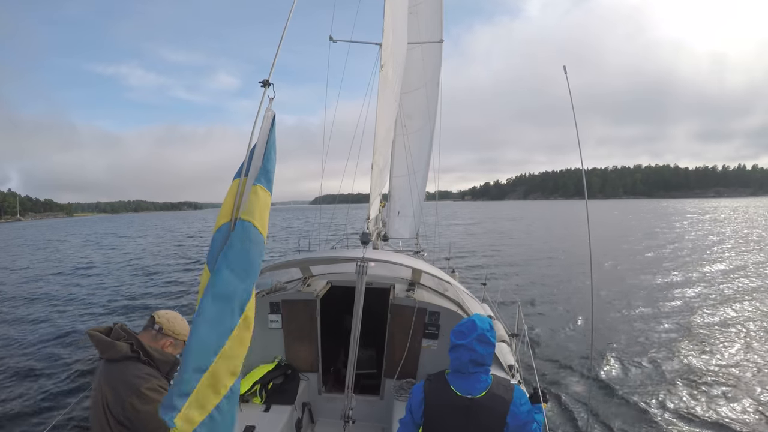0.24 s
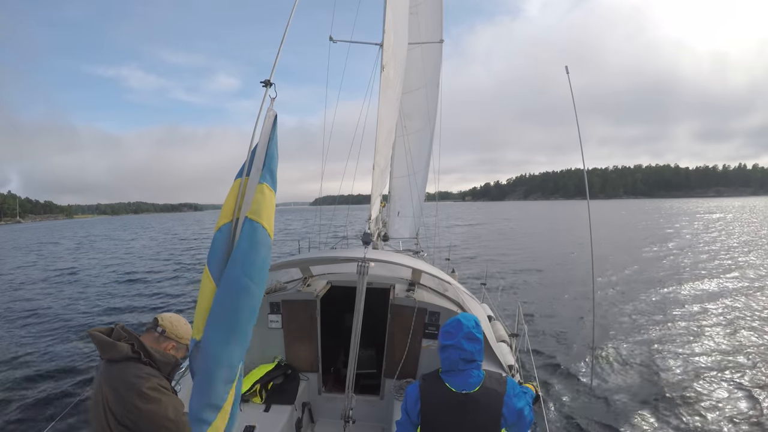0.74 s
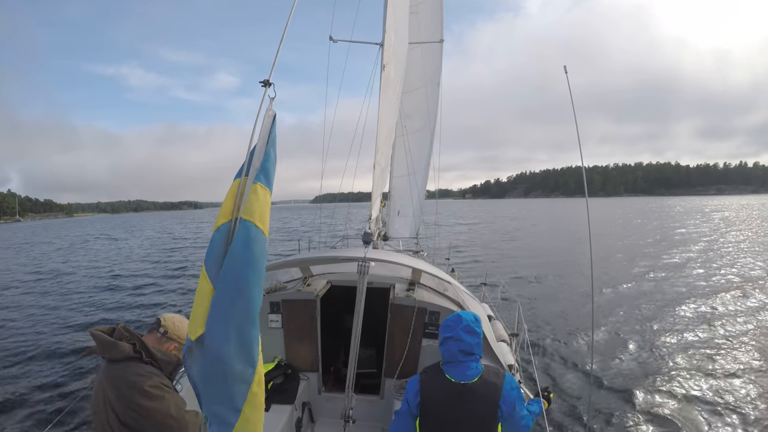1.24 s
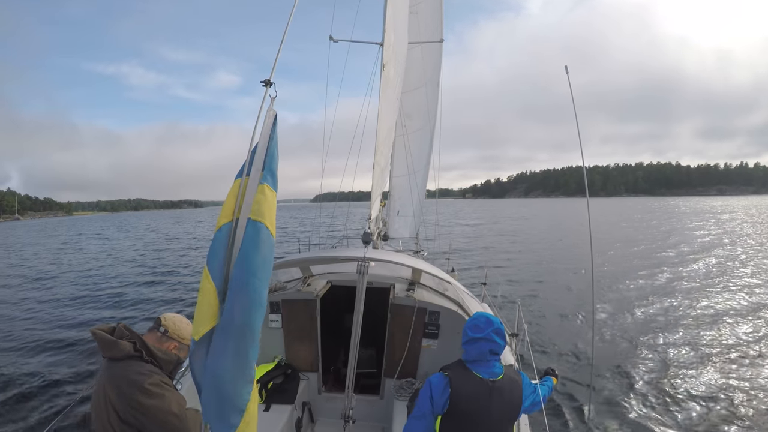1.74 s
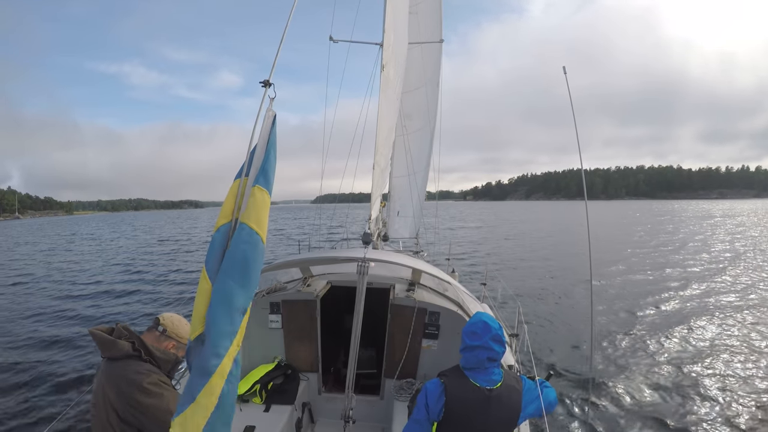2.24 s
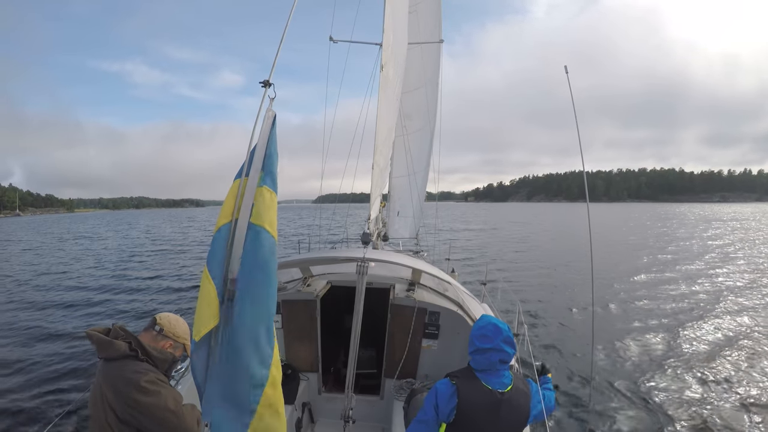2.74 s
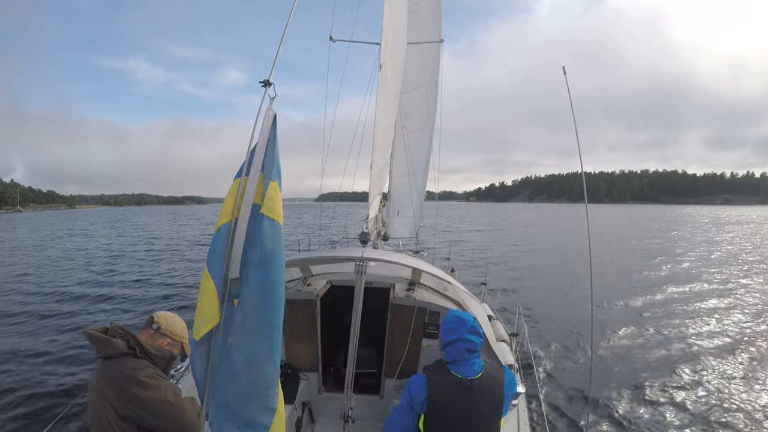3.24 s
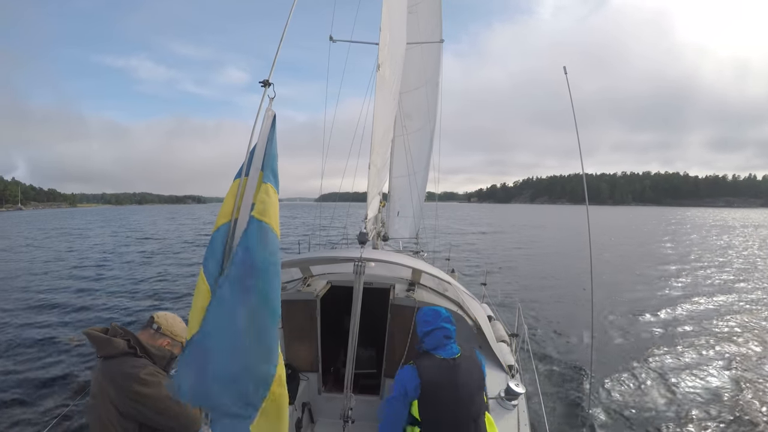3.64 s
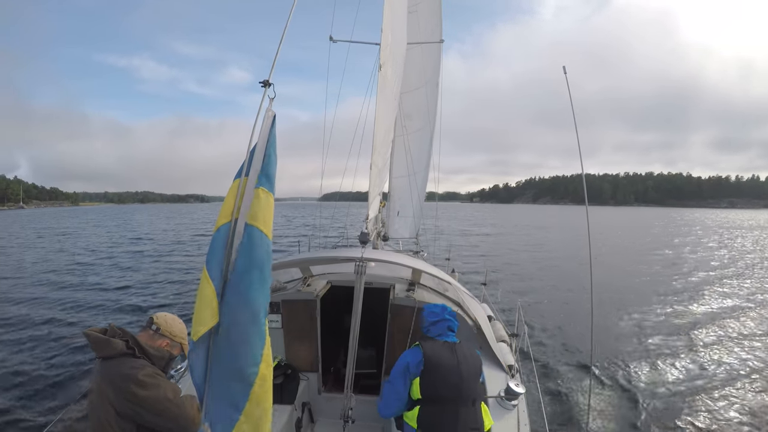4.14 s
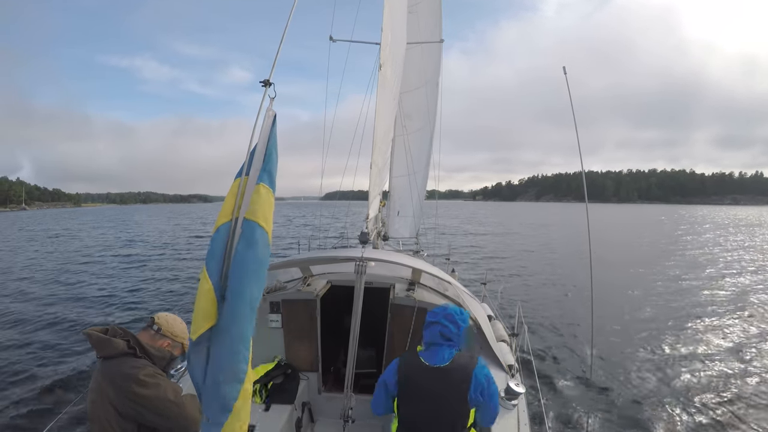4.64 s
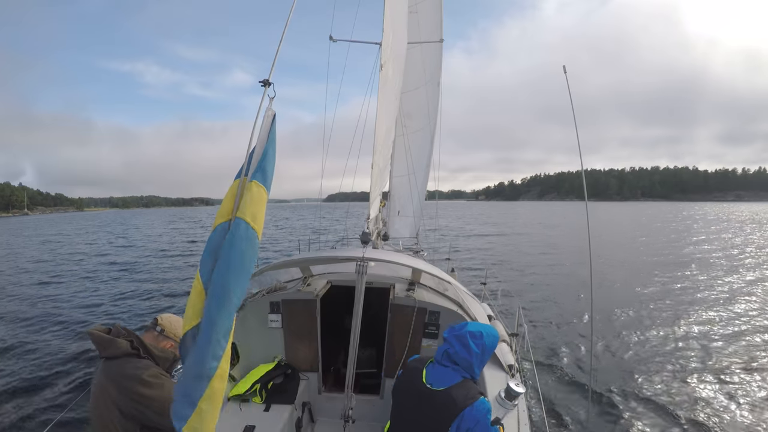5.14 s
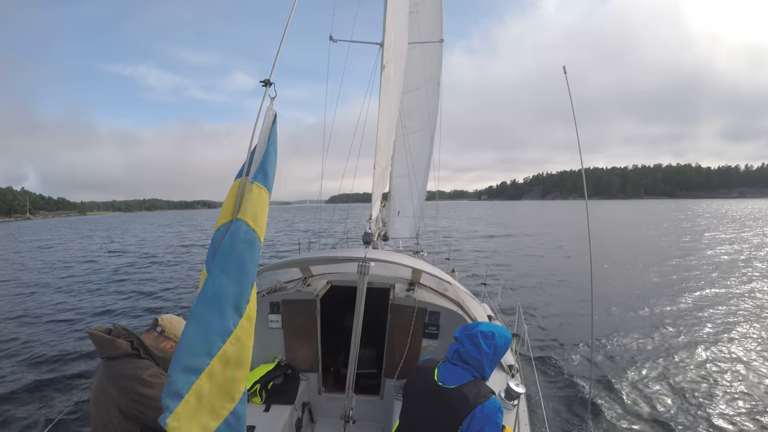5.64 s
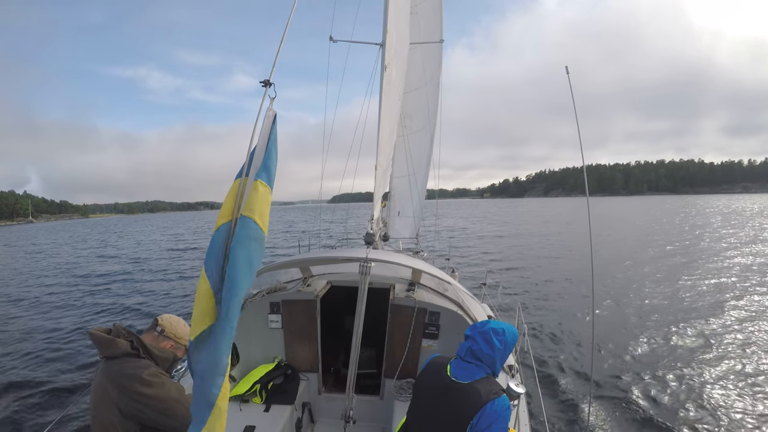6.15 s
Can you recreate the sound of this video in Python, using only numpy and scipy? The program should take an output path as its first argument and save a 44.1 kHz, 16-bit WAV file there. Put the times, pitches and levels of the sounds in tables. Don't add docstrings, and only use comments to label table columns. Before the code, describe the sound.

A rail-mounted microphone on a sailing boat hears mostly vibration through its mount, close and dry, with low wind rumble and faint hiss. At 0 to 0.2 s two hollow knocks land with a gust and a low hum, then light taps. Knocks return at 0.95 and 1.15 s, and from 1.38 to 1.76 s a rapid clattering run of woody blows and metallic rattles swells the deep hum, ending in a strong thump. It calms to faint taps and gurgles until a short cluster at 2.6 to 2.7 s with a spray hiss. Soft sloshing follows; near 3.65 s a deep shudder hums with a wind buffet. At 4.25 s the loudest blow cracks sharply, a wire singing briefly after it, followed by splashes and lesser knocks to 4.6 s. Spray hisses and gurgles at 4.8 s, then quiet rubbing and lapping, with a small knock at 6.07 s.

```python
import sys
import numpy as np
from scipy import signal
from scipy.fft import rfft, irfft, next_fast_len
from scipy.io import wavfile
from scipy.ndimage import uniform_filter1d, map_coordinates

SR = 44100
rng = np.random.default_rng(int(sys.argv[2]) if len(sys.argv) > 2 else 0)


def volts_from_db(level):
    exponent = np.asarray(level, float) / 20
    return 10 ** exponent


def file_out(sig):
    cols = np.atleast_2d(sig).T
    lim = np.clip(cols, -1, 1)
    pcm = np.round(lim * 32767).astype(np.int16)
    wavfile.write(sys.argv[1], SR, pcm)


N = 281799

# f/Hz, level/dB, t60/s
FITTING_MODES = [(2260, -2, .014), (2400, -1, .015), (2630, 0, .016), (2850, -1, .014), (3050, -3, .012),
                 (3270, -6, .013), (3550, -9, .011), (3850, -9, .013), (4150, -15, .01), (4450, -17, .01),
                 (4850, -20, .01), (5350, -20, .018), (5650, -21, .012), (6400, -25, .008)]
DRAIN_DB, DRAIN_T60_S = -15, .1


def unit(x):
    return x / np.sqrt(np.mean(x ** 2) + 1e-20)


def curves(rows):
    s, *cols = np.transpose(rows)
    return [np.interp(np.arange(N) / SR, s, c) for c in cols]


def wobble(rate_hz):
    knots = rng.standard_normal(int(N * 60 / SR) + 8)
    return map_coordinates(knots, [np.arange(N) * min(rate_hz, 59) / SR])


def filtered(x, response):
    m = next_fast_len(N + SR // 2)
    return irfft(rfft(x, m) * response(np.fft.rfftfreq(m, 1 / SR)), m)[:N]


def coloured(x, spectrum):
    f, db = np.transpose(spectrum)
    return filtered(x, lambda hz: volts_from_db(np.interp(np.log(hz + 1), np.log(f + 1), db)))


def noise(spectrum):
    return unit(coloured(rng.standard_normal(N), spectrum))


def place(out, sound, start_s):
    out[max(round(start_s * SR), 0):][:len(sound)] += sound


def swell(length_s, clumps_db, count):
    rough = rng.standard_normal((2, count))
    clumps = volts_from_db(clumps_db * unit(uniform_filter1d(rough[1], size=300)))
    rise_fall = np.sin(np.pi * np.clip(np.arange(count) / SR / length_s, 0, 1)) ** 1.5
    return rise_fall * clumps * rough[0]


def ring(modes, t, near_hz=1000, fall_db=0):
    hz, db, t60_s = np.transpose(modes)[:, :, None]
    luck = rng.standard_normal((2, len(modes), 1))
    build = np.minimum(t * hz / 3.36, 1) ** 2
    db = db - fall_db * np.log2(hz / near_hz) ** 2
    decay = volts_from_db(db + 1.5 * luck[0]) * np.exp(-np.log(1000) * t / t60_s)
    waves = decay * np.sin(2 * np.pi * hz * (1 + .006 * luck[1]) * t)
    early = 1 + 0.49 * np.exp(-t / 0.0046)
    return np.sum(build * waves, axis=0) * early


def boat(push, hull_db, deck_db, rail_db, fitting_db, near_hz=1000, fall_db=0):
    # f/Hz, level/dB, t60/s
    mount_modes = [(781.6, -6.5, 0.063), (861.7, 0, 0.057), (913.3, -0.5, 0.027), (1030, -1.5, 0.033),
                   (1108.3, 3, 0.034), (1200, -2.5, 0.039), (1326, -10, 0.075)]
    hull_modes = [(179.6, -9, 0.12), (234, -6.5, 0.17), (268, -4.5, 0.16), (325.2, -9.5, 0.11),
                  (375.7, -5, 0.052)]
    deck_modes = [(493.8, -2.5, 0.12), (517.7, -0.5, 0.055), (604.8, 2, 0.11), (700, -1, 0.11)]
    rail_modes = [(1510.5, 0.5, 0.033), (1630, 0.5, 0.041), (1710, 1, 0.04), (1800, -6, 0.065),
                  (1954, -3, 0.026), (2192, -7, 0.023)]
    t = np.arange(SR // 9) / SR
    rings = [ring(mount_modes, t, near_hz, fall_db)]
    rings += [ring(modes, t) for modes in (hull_modes, deck_modes, rail_modes, FITTING_MODES)]
    answers = signal.fftconvolve(np.array(rings), np.atleast_2d(push), axes=1)
    peaks = np.max(np.abs(answers), axis=1)
    return (volts_from_db(np.array([0, hull_db, deck_db, rail_db, fitting_db])) / peaks) @ answers


def wind():
    # t/s, level/dB
    gust_rows = [(0.0, -37.5), (0.28, -51.5), (0.34, -49.5), (0.69, -58.5), (0.94, -47), (1.58, -41),
                 (1.94, -49.5), (3.58, -51), (3.75, -38), (3.84, -52.5), (5.29, -50.5), (5.43, -50.5),
                 (6.05, -52), (6.39, -48)]
    # f/Hz, density/dB per Hz
    buffet_spectrum = [(12, -33.5), (20, -1), (49, 3), (66, 6), (92, -1), (124, 0), (140, -4.5), (152, -15),
                       (189, -24), (255, -25), (323, -37.5), (400, -43), (520, -72), (880, -120)]
    # f/Hz, density/dB per Hz
    hiss_spectrum = [(300, -8), (420, -10), (630, -3), (1000, -10.5), (1800, -12), (2400, -14.5),
                     (4000, -16.5), (8000, -22.5), (12500, -25.5), (15000, -24), (15500, -59)]
    buffet = volts_from_db(curves(gust_rows)[0] + 7.5) * noise(buffet_spectrum)
    return buffet + volts_from_db(-63.0) * noise(hiss_spectrum)


def wash():
    # t/s, level/dB
    lapping_rows = [(0.0, -40), (0.69, -69), (0.93, -67), (1.07, -70), (1.21, -44.5), (1.46, -44.5),
                    (1.87, -50), (2.21, -56.5), (3.22, -51.5), (3.9, -66), (4.2, -69), (4.31, -39),
                    (4.56, -53), (4.88, -56.5), (5.3, -58), (5.6, -57), (5.87, -64), (6.39, -55.5)]
    push = rng.standard_normal(N) * volts_from_db(5 * wobble(30))
    return volts_from_db(curves(lapping_rows)[0] - 6.0) * unit(boat(push, -0.77, -2.6, -9.0, -17)[:N])


def shaken(rows, fade_db_per_s):
    t = np.arange(0, N + 64, 64) / SR
    energy = 0
    for s, build_s, hold_s, db in rows:
        before_db = 20 * np.maximum(s - t, 0) / build_s
        after_db = fade_db_per_s * np.maximum(t - s - hold_s, 0)
        energy = energy + volts_from_db(db - before_db - after_db) ** 2
    return np.interp(np.arange(N) / SR, t, np.sqrt(energy))


def pole():
    # t/s, build-up/s, hold/s, level/dB
    rock_rows = [(0, 0.034, 0.01, -32.5), (0.098, .05, .02, -41), (.25, 0.11, 0.057, -37.5),
                 (0.493, 0.37, 0.093, -36.5), (1.086, 0.2, 0.081, -26), (1.394, 0.11, 0.09, -22),
                 (1.706, 0.18, .05, -30.5), (1.815, 0.26, 0.19, -27.5), (2.162, 0.12, 0.021, -30.5),
                 (2.323, 0.14, 0.026, -32.5), (2.695, 0.14, 0.27, -30.5), (3.227, 0.11, 0.018, -33),
                 (3.646, 0.027, 0.011, -17.5), (3.755, .1, 0.17, -23), (4.204, 0.18, 0.13, -39),
                 (4.423, 0.13, 0.3, -43), (4.872, 0.3, 0.077, -31), (5.304, 0.14, 0.15, -33),
                 (5.597, 0.36, 0.2, -31.5), (5.99, .15, 0.043, -35), (6.251, 0.18, 0.15, -30.5)]
    # t/s, hold/s, level/dB
    jolt_rows = [(0.03, 0.0079, -20), (0.163, 0.044, -28), (0.356, .02, -38), (0.523, 0.19, -45.5),
                 (.95, 0.094, -39), (1.199, 0.014, -19.5), (1.426, 0.074, -18.5), (1.559, 0.055, -17.5),
                 (1.805, 0.017, -16), (1.99, 0.08, -36), (2.172, 0.017, -35.5), (2.403, 0.018, -37.5),
                 (2.607, 0.091, -30.5), (2.764, 0.041, -28), (2.96, 0.027, -42), (3.102, 0.092, -39),
                 (3.655, 0.0067, -19), (3.8, 0.046, -36), (4.278, 0.034, -24.5), (4.412, 0.019, -28),
                 (4.593, 0.069, -31), (4.926, 0.047, -32.5), (5.147, 0.075, -36.5), (5.347, 0.074, -46),
                 (5.958, 0.062, -45.5), (6.117, 0.11, -39.5)]
    jolt_hz = [122.6, 121.3, 126.4, 121.1, 120.8, 121.9, 121.4, 119.4, 123.2, 120.6, 120.2, 120.1, 126.5,
               127.9, 122.5, 114.6, 119.9, 119.7, 115, 120.4, 127, 126.9, 124.8, 124.4, 123.1, 117.4]
    build_s = 0.027
    jolts = [(s, build_s, hold_s, db) for s, hold_s, db in jolt_rows]
    pitches = [(s + hold_s / 2 + build_s / 2, hz) for (s, hold_s, db), hz in zip(jolt_rows, jolt_hz)]
    lower = (63.95, shaken(rock_rows, 130.5), .012, 1)  # Hz, amplitude, pitch wander, flutter dB
    upper = (curves(pitches)[0], shaken(jolts, 158), .012, 2)
    hum = 0
    for hz, level, wander, flutter_db in (lower, upper):
        phase = 2 * np.pi * np.cumsum(hz * (1 + wander * wobble(11))) / SR
        hum = hum + level * volts_from_db(flutter_db * wobble(18)) * np.sin(phase)
    return hum


def spray():
    # t/s, length/s, centre f/Hz, width/octaves, level/dB
    spray_rows = [(1.38, 0.2, 4480, .5, -76), (2.588, 0.041, 4480, 0.34, -76),
                  (2.716, 0.052, 3200, 0.71, -58), (2.722, 0.021, 7940, 0.044, -65),
                  (2.927, 0.051, 3350, 0.28, -61.5), (2.953, 0.031, 5300, 0.078, -63.5),
                  (3.53, 0.11, 3320, 0.57, -62), (4.326, 0.05, 6960, 0.32, -67),
                  (4.329, 0.046, 3220, 0.31, -59.5), (2.996, 0.21, 2700, 0.63, -71),
                  (4.77, 0.23, 2780, 0.62, -57), (5.413, 0.13, 2700, 0.35, -72), (4.8, 0.15, 6500, .4, -69),
                  (4.845, 0.065, 5360, 0.07, -67), (4.885, 0.067, 5380, 0.041, -66),
                  (5.573, 0.085, 5230, 0.13, -72), (6.078, 0.024, 3960, .7, -68.5)]
    # t/s, length/s, centre f/Hz, level/dB
    gurgle_rows = [(.274, 0.09, 1030, -56), (.085, 0.024, 1400, -62), (.262, 0.024, 1600, -61),
                   (1.295, 0.042, 760, -48.5), (1.33, 0.026, 1080, -47), (1.335, 0.028, 1970, -58),
                   (2.465, .05, 705, -63), (2.5, 0.16, 230, -56), (3.0, 0.15, 232, -56),
                   (3.56, 0.038, 1240, -54.5), (3.615, 0.05, 206, -49.5), (3.8, 0.16, 402, -71),
                   (4.285, 0.057, 640, -42.5), (4.62, 0.058, 610, -47.5), (4.775, 0.05, 1030, -55.5),
                   (4.805, 0.041, 1480, -58), (4.86, 0.044, 1030, -51), (4.982, 0.055, 650, -58.5),
                   (5.038, 0.036, 1150, -61), (5.148, 0.054, 490, -57), (5.3, 0.17, 400, -65),
                   (5.368, 0.032, 816, -57.5), (5.39, 0.022, 1630, -63), (5.235, 0.041, 580, -62.5),
                   (5.19, 0.035, 1634, -63.5), (5.43, .08, 1540, -59), (5.81, .08, 684, -71),
                   (6.07, 0.052, 870, -54), (6.15, 0.045, 1103, -62)]
    # t/s, length/s, centre f/Hz,
    # level/dB
    pocket_rows = [(.31, 0.044, 3230, -71), (.598, 0.039, 880, -60.5), (2.37, .04, 1110, -60),
                   (2.48, .04, 1320, -68), (2.497, 0.038, 1770, -67.5), (2.49, .06, 840, -67),
                   (2.799, 0.025, 1700, -69), (2.985, 0.036, 1750, -70), (3.029, 0.087, 600, -55.5),
                   (3.4, .03, 840, -70), (3.451, 0.037, 1780, -69), (3.525, .03, 874, -64.5),
                   (3.55, .03, 1400, -66), (3.585, .035, 857, -59), (3.627, 0.031, 1800, -65),
                   (3.663, 0.03, 1760, -68), (3.735, .03, 790, -71.5), (3.8, .04, 730, -76),
                   (4.252, 0.011, 3250, -43), (4.427, 0.015, 3270, -52), (4.903, 0.054, 1720, -59),
                   (5.465, .093, 618, -62.5), (5.545, 0.034, 1710, -69), (5.644, 0.029, 1166, -65.5),
                   (5.881, 0.055, 1710, -72), (6.13, 0.085, 692, -58), (6.29, 0.03, 1090, -68.5)]
    bursts = list(spray_rows)
    for rows, octaves in ((gurgle_rows, 0.2), (pocket_rows, 0.042)):
        bursts += [(s, length_s, hz, octaves, db) for s, length_s, hz, db in rows]
    out, hz = np.zeros(N + SR), np.fft.rfftfreq(12000, 1 / SR) + 1
    for s, length_s, centre_hz, octaves, db in bursts:
        band = np.exp(-.5 * (np.log2(hz / centre_hz) / octaves) ** 2)
        burst = irfft(rfft(swell(length_s, clumps_db=3, count=12000)) * band)
        burst = np.roll(burst, 882)
        place(out, volts_from_db(db + 12) * burst / np.max(np.abs(burst)), s - 882 / SR)
    return out[:N]


def struck_notes(rows, build_s):
    t, out = np.arange(N) / SR, np.zeros(N)
    for s, hz, db, t60_s in rows:
        u = np.maximum(t - s, 0)
        envelope = volts_from_db(db - 60 * u / t60_s) * (1 - np.exp(-u / build_s)) ** 2
        out += envelope * np.sin(2 * np.pi * hz * u)
    return out


def stay():
    # t/s, f/Hz, level/dB, t60/s
    wire_rows = [
        (.628, 1720, -40, 0.089),
        (.672, 2170, -29.5, 0.037),
        (.975, 2150, -37, 0.12),
        (1.782, 1856, -35.5, 0.15),
        (4.268, 1850, -28, 0.19),
        (4.44, 1890, -37, 0.09),
    ]
    return struck_notes(wire_rows, build_s=0.0051) * volts_from_db(1.5 * wobble(50))


def thumps():
    # t/s, f/Hz, level/dB, t60/s
    thump_rows = [(1.7598, 726, 3.5, 0.017), (1.762, 842, -13, 0.053), (1.765, 1804, -16.5, 0.062),
                  (4.2525, 1093, -1.5, 0.035), (4.2598, 1906, -9, 0.025), (4.263, 798, -11, 0.099),
                  (4.272, 620, -18, 0.039)]
    return struck_notes(thump_rows, build_s=0.00095)


def sloshes():
    # t/s, length/s, peak level/dB, deck level/dB, rail level/dB
    slosh_rows = [(0, 0.22, -61, 5, -28), (0.251, 0.18, -48, -16, -3), (0.418, 0.11, -49, -10, -10),
                  (0.827, 0.29, -41, -15, -18), (0.97, 0.061, -43, -22, -23),
                  (1.114, 0.068, -28.5, -27, -31), (1.289, 0.14, -42.5, -45, -10.5),
                  (1.387, 0.25, -36, -2, -22.5), (1.766, 0.095, -44, 1.5, -17),
                  (2.601, 0.19, -43, -4.5, -6), (2.96, 0.24, -48.5, 2, -6), (3.199, 0.27, -55, -32, -1.5),
                  (3.521, 0.14, -45.5, -14, -7.5), (4.182, 0.08, -50, -5, -23),
                  (4.31, 0.056, -33, -3.5, -15), (4.433, 0.065, -43, -3.5, -15), (4.488, 0.041, -54, 0, -7),
                  (4.774, 0.2, -41, -29, -0.5), (4.976, 0.084, -56, -4, -12), (5.138, 0.17, -65.5, 7.5, -2),
                  (5.354, 0.2, -49, -14, -3), (5.531, 0.05, -62, -8, 7), (5.79, 0.14, -59, -2, -1.5),
                  (6.077, 0.14, -50, 3, -8.5), (6.268, 0.11, -70, -17, 12)]
    out = np.zeros(N + SR)
    for s, length_s, db, deck_db, rail_db in slosh_rows:
        push = swell(length_s, clumps_db=5, count=SR // 4)
        sound = boat(push, deck_db + 0.5, deck_db, rail_db, rail_db - 10)
        place(out, volts_from_db(db + 3.5) * sound, s)
    return out[:N]


def rattles():
    # t/s, peak level/dB, length/s, favoured f/Hz
    rattle_rows = [(0.114, -50.5, 0.0023, 2600), (.171, -44.5, 0.0022, 3400), (.935, -61, .003, 3200),
                   (0.97, -58, 0.0034, 3250), (.993, -67, .003, 3250), (1.146, -45, .003, 2780),
                   (1.385, -36, 0.0017, 2700), (1.433, -49, 0.0027, 3000), (1.463, -36, 0.0017, 2920),
                   (1.478, -50, 0.0036, 2850), (1.532, -33.5, 0.0025, 2750), (1.588, -45, 0.0033, 3000),
                   (1.607, -36.5, 0.0022, 3300), (1.76, -27, 0.0034, 2590), (2.599, -38.5, 0.004, 3180),
                   (2.613, -48, 0.0019, 3000), (2.667, -54, 0.0018, 2600), (2.722, -37.5, 0.0037, 2600),
                   (2.727, -46, .001, 5000), (2.843, -60, .002, 3000), (3.165, -55.5, .002, 2730),
                   (3.629, -53, 0.0018, 2830), (4.253, -30, 0.0011, 2400), (4.429, -40.5, 0.0055, 3600),
                   (6.067, -48.5, 0.0053, 2930)]
    out, t = np.zeros(N + SR), np.arange(SR // 20) / SR
    for s, db, length_s, near_hz in rattle_rows:
        envelope = t / length_s * np.exp(1 - t / length_s) + volts_from_db(DRAIN_DB - 60 * t / DRAIN_T60_S)
        shake = envelope * rng.standard_normal(len(t))
        sound = signal.fftconvolve(shake, ring(FITTING_MODES, t, near_hz, fall_db=7))
        place(out, volts_from_db(db) * sound / np.max(np.abs(sound)), s - .002)
    return out[:N]


def peak_clicks():
    # t/s, level/dB
    click_rows = [(.174, -58), (1.147, -56), (1.388, -55.5), (1.466, -56), (1.537, -55.5), (1.611, -55),
                  (1.762, -44), (2.604, -47), (2.733, -52), (4.2563, -30), (6.07, -61)]
    # f/Hz, density/dB per Hz
    click_spectrum = [(1500, -120), (2500, -19), (4000, -0.5), (6000, -4), (8000, -6), (11000, -21.5),
                      (15000, -24.5)]
    clicks = np.zeros(N)
    for s, db in click_rows:
        clicks[round(s * SR)] = 5 * volts_from_db(db)
    return coloured(clicks, click_spectrum)


def slaps():
    # t/s, peak level/dB, deck level/dB, rail level/dB, favoured mount f/Hz
    knock_rows = [(.002, -27.5, 3, 0.5, 990), (0.1143, -20, -27, -17, 820), (0.937, -26, -13, -2, 1090),
                  (0.974, -16.5, -30, -18, 890), (0.99, -19, -20.5, -7, 980),
                  (1.148, -17.5, -15, -1.5, 830), (1.384, -11.5, -11, -15, 944),
                  (1.434, -14.5, -12, -19, 960), (1.46, -19, -31, -15, 930),
                  (1.479, -13.5, -17, -21.5, 990), (1.529, -13.5, -11.5, -18.5, 1000),
                  (1.587, -14, -12.5, -21, 1040), (1.608, -26, -3.5, -4.5, 1000),
                  (1.762, -10, 0, -3.5, 968), (2.601, -21.5, -13, -9, 870), (2.616, -20.5, -25, -16, 970),
                  (2.664, -21.5, -10.5, -19, 850), (2.688, -23, -13, -11.5, 990),
                  (2.7201, -18, -17, -11, 1070), (4.2565, -2.5, -13, -6, 1058), (4.4248, -32, -1, -8, 900),
                  (4.429, -17.5, -3.5, -8.5, 950), (4.613, -22, -9.5, -10.5, 1065),
                  (6.069, -37, 1, -1, 1010)]
    tap_rows = [(0.172, -30.5, -10.5, -6.5, 1000), (.284, -45, -18, -20, 1000), (.313, -40, -8.5, -6, 900),
                (0.346, -29.5, -22, -2.5, 950), (.623, -34, -11.5, 1.5, 1060),
                (.671, -27.5, -16.5, -16, 990), (.826, -47, -7, -10, 796), (0.855, -44.5, -2, -0.5, 1200),
                (.917, -52, -7, 0, 930), (1.133, -33, -8, -12, 1010), (1.161, -36, -10, -14, 940),
                (1.226, -35, -7, -4.5, 860), (1.394, -21.5, -9.5, -19, 990), (1.54, -25, -17, -11, 1000),
                (1.714, -47, 2.5, -20, 950), (2.010, -44, -14, -11, 910), (2.028, -37, -13, -2, 1000),
                (2.163, -31.5, -18, -3, 930), (2.364, -35, -23, -17, 1030), (2.574, -35, -6, -13, 940),
                (2.713, -33, -9, -5, 1000), (2.958, -55.5, 7.5, 4.5, 950), (3.163, -34.5, -25, -14, 1060),
                (3.244, -38, -9.5, -9, 1030), (3.464, -54, 1, -2, 945), (3.626, -31.5, -2.5, -18, 960),
                (3.839, -60, -18, 4, 1110), (4.346, -32, -15, -21.5, 1070), (4.497, -37.5, -10, -8, 1110),
                (4.582, -65, -14, -10, 850), (4.864, -32, -23, -24, 1110), (5.441, -42, 4.5, -15, 900),
                (5.653, -50, -20, -3.5, 1150)]
    strike_gain = [
        [40],
        [16],
        [16],
        [10],
        [5],
    ]
    drain_part_db = [
        [-7],
        [0],
        [-1],
        [-3],
        [-7],
    ]
    out, t = np.zeros(N + SR), np.arange(SR // 16) / SR
    blow_s = np.array([[.0009], [.0012], [.0009], [.0013], [.0028]])
    drain = volts_from_db(DRAIN_DB + np.array(drain_part_db) - 60 * t / DRAIN_T60_S) * (1 - np.exp(-t / .004))
    rough = t / blow_s * np.exp(1 - t / blow_s) + drain
    strike = np.array(strike_gain) * (np.arange(len(t)) == round(.0006 * SR))
    for s, db, deck_db, rail_db, near_hz in knock_rows + tap_rows:
        push = strike + rough * rng.standard_normal(rough.shape)
        sound = boat(push, deck_db - 9.5, deck_db, rail_db, rail_db - 21, near_hz, fall_db=57.5)
        place(out, volts_from_db(db - 2.0) * sound, s - .0025)
    return out[:N]


def scene():
    background = wind() + wash() + pole() + spray()
    struck = stay() + thumps() + sloshes() + rattles() + peak_clicks() + slaps()
    return (background + struck)[None]


def low_pass(x):
    return signal.sosfilt(signal.butter(12, 15300, fs=SR, output="sos"), x)


def record(dry):
    clipped = dry / (1 + np.abs(dry / .87) ** 30) ** (1 / 30)
    gaps = uniform_filter1d(1. * (wobble(35) > 1.4), size=200)
    top_band = filtered(clipped[0], lambda hz: hz > 13200)
    mix = clipped - gaps * top_band
    return low_pass(mix)


dry = scene()
out = record(dry)
file_out(out)
```